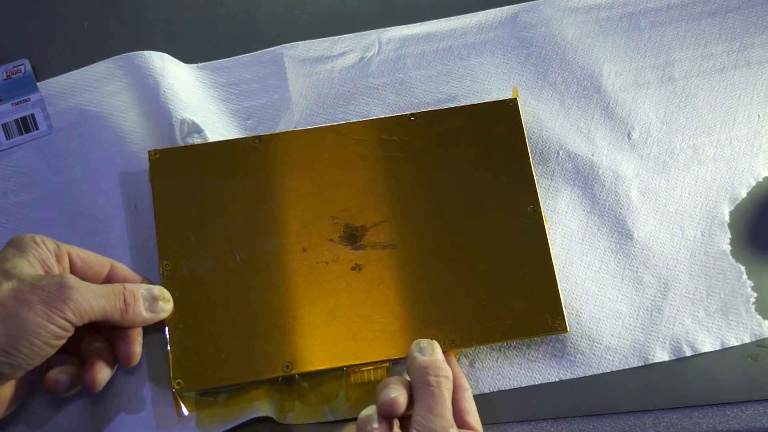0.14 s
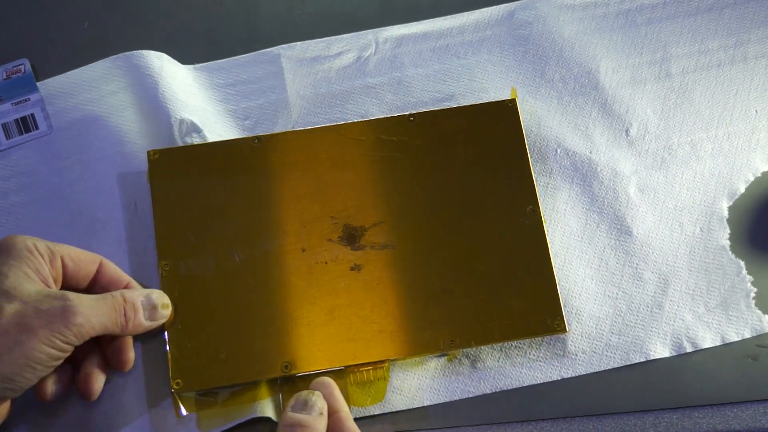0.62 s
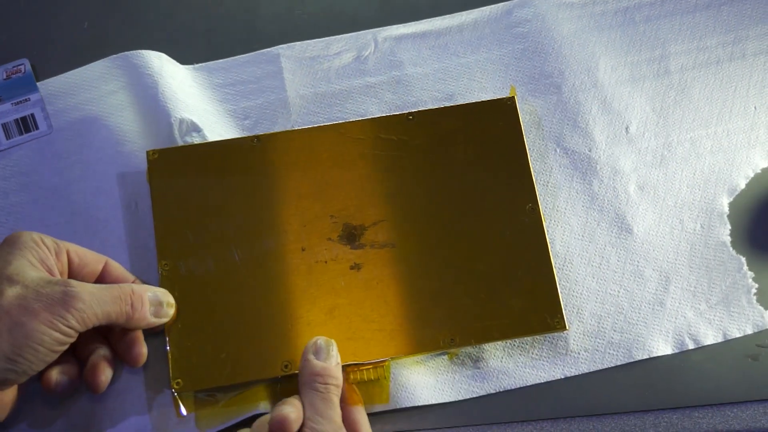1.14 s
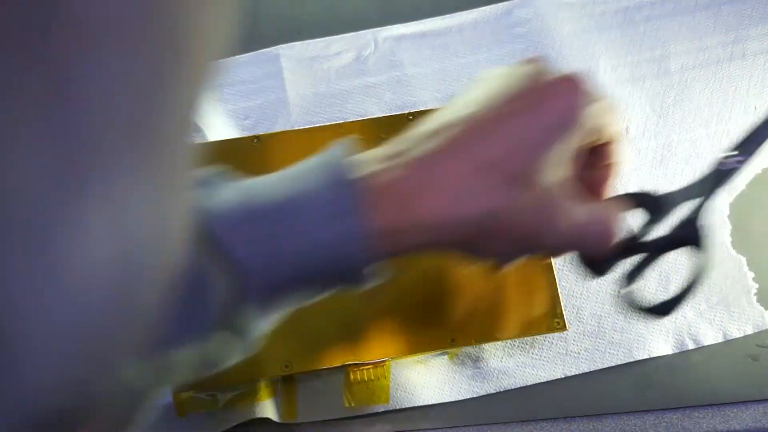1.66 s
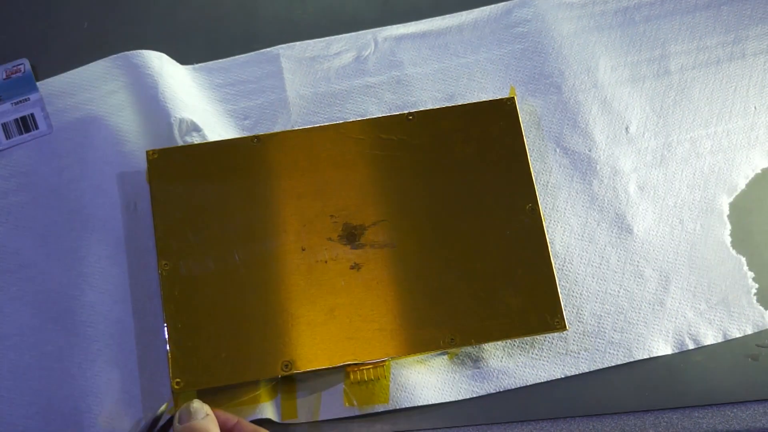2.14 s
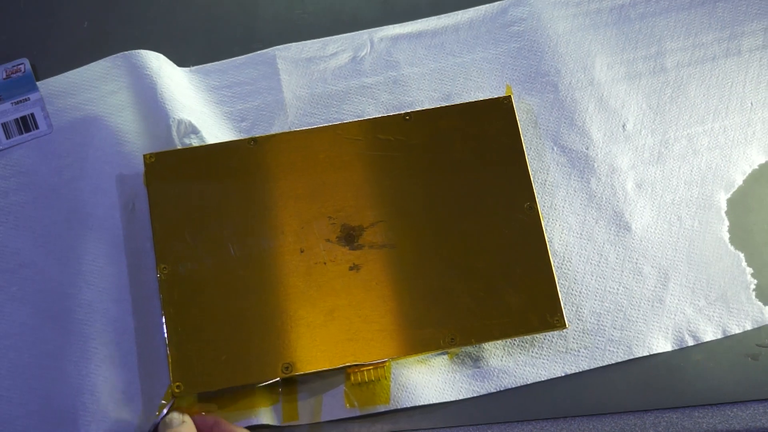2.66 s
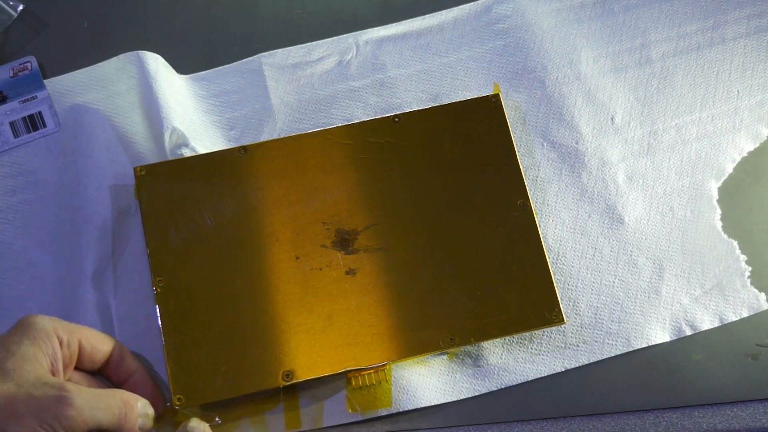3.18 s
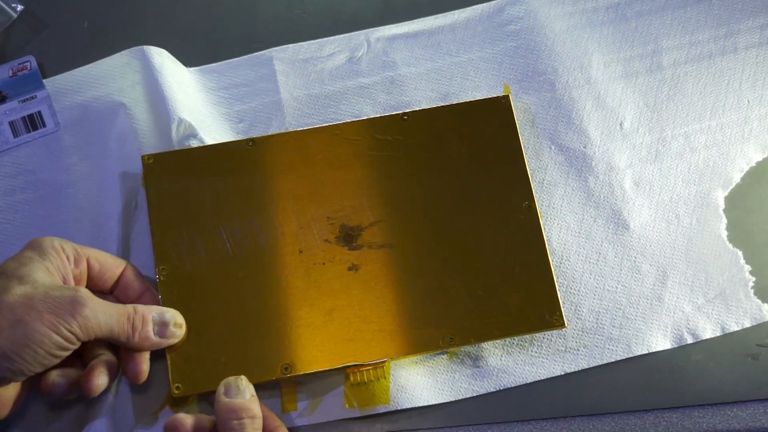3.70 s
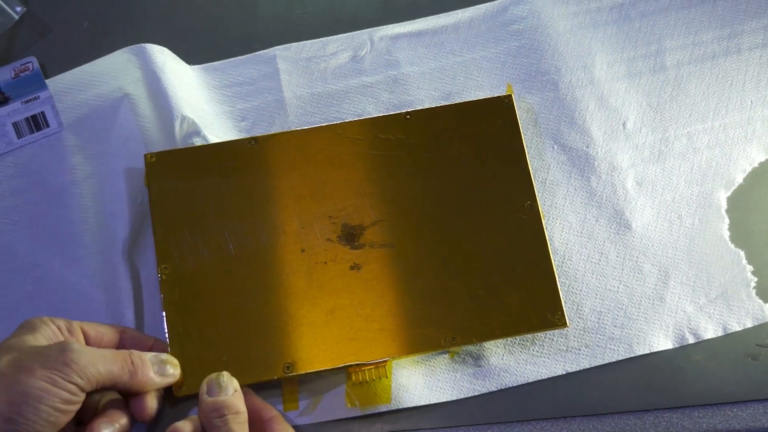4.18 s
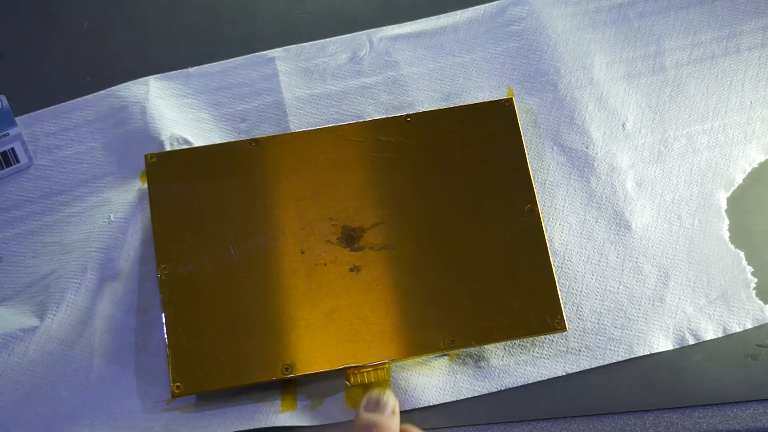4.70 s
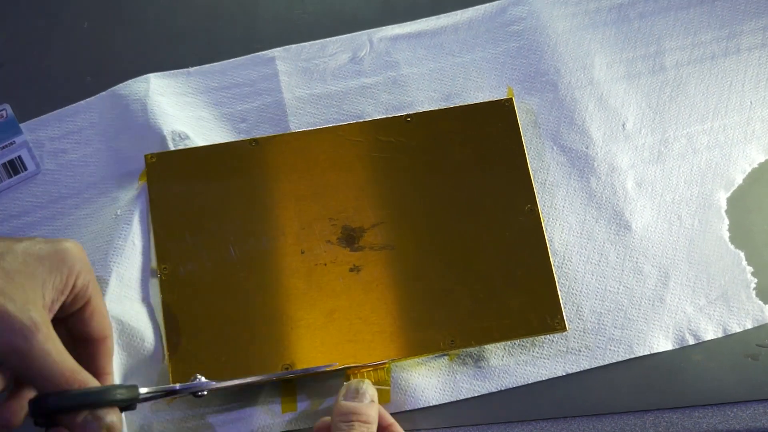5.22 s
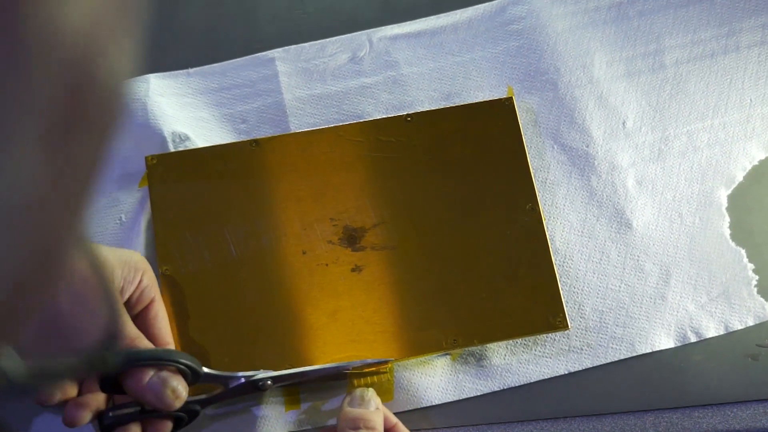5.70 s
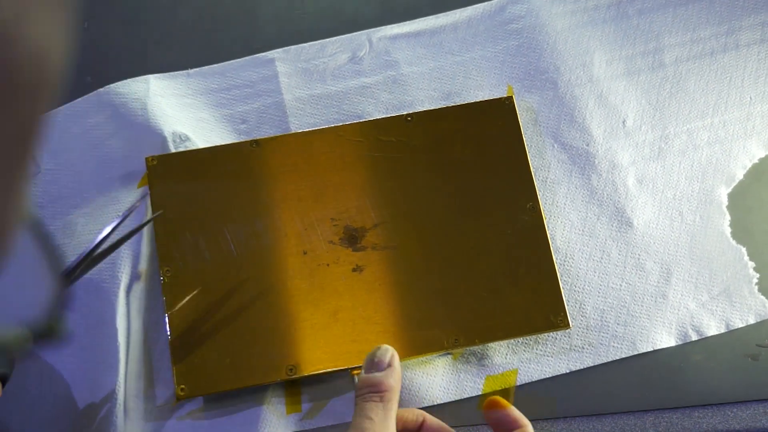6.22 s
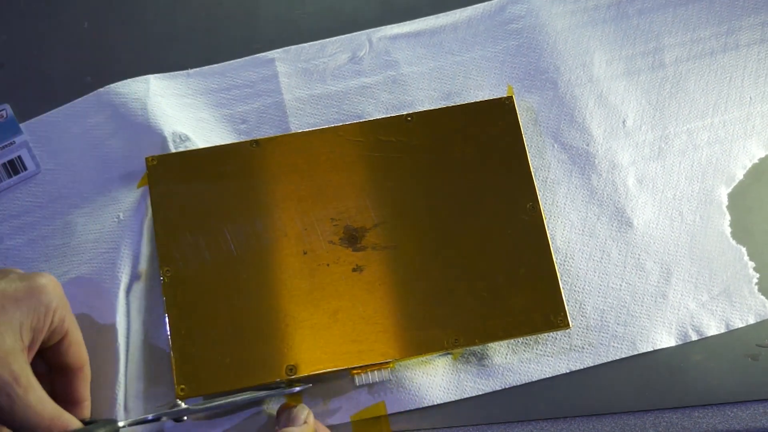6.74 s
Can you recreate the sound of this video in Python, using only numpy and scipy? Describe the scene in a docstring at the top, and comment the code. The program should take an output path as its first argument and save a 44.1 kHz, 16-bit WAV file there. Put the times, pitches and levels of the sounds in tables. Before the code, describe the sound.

Close, dry tape clicks and plate taps come in bursts, then a jerky scrape over paper and light scissor snips, above quiet ventilation.

```python
"""Stiff adhesive tape snaps and crinkles as hands pull it along the edge of a metal plate lying on paper;
scissors snip it, close to a stereo microphone. Snaps are decaying noise bursts through broad resonances, echoed by
the bench top. Fingers and blades scuff (swelled micro-slip noise), the plate is dragged and knocked (damped modes),
narrow resonances ring, the bench thumps (low modes) and paper rustles (flickering noise).
A ventilation hum and room noise lie underneath."""
import sys
import numpy as np
from scipy import signal
from scipy.fft import rfft, irfft, next_fast_len
from scipy.io import wavfile
from scipy.ndimage import uniform_filter1d, map_coordinates

SR = 44100
rng = np.random.default_rng(int(sys.argv[2]) if len(sys.argv) > 2 else 0)


def file_out(sig):
    """Save sig as 16-bit WAV at sys.argv[1]."""
    # one column per channel
    cols = np.atleast_2d(sig).T
    # limit, then scale
    lim = np.clip(cols, -1, 1)
    pcm = np.round(lim * 32767).astype(np.int16)
    wavfile.write(sys.argv[1], SR, pcm)


def level_to_linear(level):
    """Convert decibel levels to linear amplitude factors, elementwise."""
    exponent = np.asarray(level, float) / 20
    return 10 ** exponent


N = 302526

# Paper rustling under the plate. Each row: time in seconds, base level in dB.
RUSTLE_LEVEL = [(0.0, -67.5), (2.69, -65), (3.04, -59), (3.52, -67.5), (4.5, -61.5), (5.05, -67),
                (5.62, -69), (5.96, -59), (6.09, -69), (6.86, -69.5)]


def unit(x):
    """Scales to unit rms."""
    return x / np.sqrt(np.mean(x ** 2) + 1e-20)


def along(points, hz):
    """Interpolates (Hz, value) points on a log frequency axis."""
    f, v = np.transpose(points)
    return np.interp(np.log(hz + 1), np.log(f + 1), v)


def curve(rows):
    """Interpolates (s, value) rows to one value per sample."""
    return np.interp(np.arange(N) / SR, *np.transpose(rows))


def wobble(rate_hz):
    """A smooth random curve, rate_hz knots a second."""
    knots = rng.standard_normal(int(N * rate_hz / SR) + 4)
    return map_coordinates(knots, [np.arange(N) * rate_hz / SR])


def filtered(x, response):
    """Filters x by a complex response of frequency in Hz."""
    m = next_fast_len(x.shape[-1] + 4096)
    spectrum = rfft(x, m) * response(np.fft.rfftfreq(m, 1 / SR))
    return irfft(spectrum, m)[..., :x.shape[-1]]


def noise(spectrum):
    """Unit-rms noise shaped by (Hz, dB) points."""
    return unit(filtered(rng.standard_normal(N), lambda hz: level_to_linear(along(spectrum, hz))))


def hump(centre_hz, octaves, skirt_db):
    """A causal broad resonance with a flat skirt that falls away in the bass."""
    def response(hz):
        peak = np.exp(-(np.log2((hz + 1) / centre_hz) / max(octaves, .1)) ** 2 / 4)
        skirt = level_to_linear(skirt_db) * hz ** 2 / (hz ** 2 + 1300 ** 2)
        # minimum phase, by folding the cepstrum
        cepstrum = irfft(np.log(peak + skirt + 1e-4))
        cepstrum[1:len(hz) - 1] *= 2
        cepstrum[len(hz):] = 0
        return np.exp(rfft(cepstrum))
    return response


def add(track, s, sound):
    """Mixes sound into track from s seconds on."""
    part = track[max(round(s * SR), 0):][:len(sound)]
    part += sound[:len(part)]


def snaps():
    """A faint noise swells for a few milliseconds before each snap; bench echoes and a short crackle follow."""
    # Snaps of tape and blades. Each row: time in seconds, peak before echoes in dB, centre in Hz.
    snap_rows = [(0.0508, -32, 5500), (0.077, -31.5, 8450), (1.3793, -18.5, 4330), (1.5832, -22.5, 1800),
                 (1.63, -21, 5800), (2.283, -26.5, 8100), (2.3549, -22, 7540), (2.3655, -19, 7800),
                 (2.4348, -25, 7960), (2.5512, -28, 8500), (2.5882, -32.5, 7200), (2.657, -26.5, 8070),
                 (2.6983, -24.5, 9580), (2.704, -28.5, 4900), (2.7308, -33, 5270), (2.798, -35, 9700),
                 (2.8563, -5, 12000), (2.963, -19.5, 5900), (2.9705, -19, 6800), (2.9773, -22.5, 3020),
                 (3.013, -27, 9600), (3.0216, -20.5, 2020), (3.0363, -14, 7500), (3.0509, -21, 7600),
                 (3.1641, -4.5, 10300), (3.2568, -23, 7000), (3.2869, -23.5, 7350), (3.4258, -17.5, 10300),
                 (3.4707, -9, 8200), (3.855, -23.5, 9750), (4.885, -27, 7950), (5.2632, -23, 8100),
                 (5.293, -33, 8700), (5.3497, -17, 8250), (5.9578, -32.5, 5600), (6.0654, -20, 9540)]
    # The brightest snaps ring narrowly. Each row: centre in Hz, spread in octaves.
    snap_spread = [(2500, 0.67), (8000, 0.99), (10000, 0.17)]
    # Echoes off the bench and nearby things. Each row: delay in seconds, treble level in dB.
    echo_rows = [(.0016, -3), (.0039, -20), (.0056, -22)]
    burst_t60_cycles, crackle_t60_s, lead_in_t60_s = 11.3, 0.034, 0.0068
    crackle_db, crackle_db_per_snap_db = -28, 0.75  # crackle_db: at release of a 0 dB snap

    def echoes(f):
        delayed = sum(level_to_linear(db) * np.exp(-2j * np.pi * f * s) for s, db in echo_rows)
        return 1 + f / (f + 1500) * delayed

    out, t = np.zeros(N), np.arange(-400, 2600) / SR
    for s, db, hz in snap_rows:
        octaves = along(snap_spread, hz)
        decay = level_to_linear(-60 * np.abs(t) / (burst_t60_cycles / hz)) * (t >= 0)
        burst = rng.standard_normal(len(t)) * decay
        skirt_db = -42 - 2.3 * np.log2(8000 / hz)  # duller snaps have less treble skirt
        click = filtered(burst, hump(hz, octaves, skirt_db))
        crackle = unit(filtered(rng.standard_normal(len(t)), hump(0.37 * hz, octaves + .5, skirt_db=-25)))
        lead_in = level_to_linear(-21.0 + 60 * t / lead_in_t60_s)
        envelope = np.where(t >= 0, level_to_linear(-60 * t / crackle_t60_s), lead_in)
        echoed = level_to_linear(db) * filtered(click, echoes) / np.abs(click).max()
        add(out, s + t[0], echoed + level_to_linear(crackle_db + crackle_db_per_snap_db * db) * envelope * crackle)
    return out


def plate(force, t60_s, near_hz):
    """The plate's modes, the higher dying sooner; contact place favours those near near_hz, grip detunes them."""
    # Modes of the plate, damped by the paper under it. Each row: frequency in Hz, level in dB.
    plate_modes = [(910, 12), (1100, 10), (1490, -16), (1950, 12), (2640, -15), (3300, -5)]
    hz, db = np.transpose(plate_modes)
    db = db - 13 * np.abs(np.log2(hz / near_hz)) + rng.normal(0, 2.3, len(hz))
    hz = hz * rng.normal(1, .025, len(hz))

    def mode(f, k, c):
        width_hz = np.log(1000) / (np.pi * t60_s) * (c / hz[0]) ** .5  # t60_s is the lowest mode's
        return (-1) ** k * level_to_linear(db[k]) * 1j * f * c / (c * c - f * f + 1j * f * width_hz)

    return filtered(force, lambda f: sum(mode(f, k, c) for k, c in enumerate(hz)))


def rubbing(size, hz, low_db):
    """Dense uneven micro-slips; they also drive the plate and a dull body."""
    slips = rng.standard_normal(size) * level_to_linear(1.5 * rng.exponential(size=size))
    lumps = level_to_linear(2.0 * map_coordinates(rng.standard_normal(size // 100 + 2), [np.arange(size) / 100]))
    bright = unit(filtered(slips, hump(hz, 0.84, skirt_db=-33)))
    body = unit(filtered(slips, hump(1467, 0.82, skirt_db=-80)))
    dull = unit(unit(plate(slips, t60_s=0.039, near_hz=1200)) + 1.8 * body)
    return lumps * (bright + level_to_linear(low_db) * dull)


def scuffs(count=30):
    """Rubbing under a swell, for the listed strokes and for faint ones at random, likelier in louder rustle."""
    # Scuffs and crinkles. Each row: middle in seconds, level in dB, length in seconds,
    # dull part over bright part in dB.
    scuff_rows = [(0.321, -58, 0.033, -3), (0.729, -51, 0.015, -3.5), (0.831, -59, 0.033, -2),
                  (1.021, -48.5, 0.039, -6.5), (1.168, -59, 0.03, -1), (1.306, -59, 0.05, -18),
                  (1.3854, -38.5, 0.026, -4), (1.401, -47, 0.0067, -1), (1.445, -58, 0.06, 2),
                  (1.592, -46, 0.03, 3), (1.607, -56.5, 0.079, 8), (1.631, -42, 0.022, 3),
                  (1.712, -39, 0.059, -37), (1.769, -53, 0.022, -10), (1.786, -43.5, 0.072, -30),
                  (2.098, -49, 0.02, -6), (2.141, -53.5, 0.033, 3.5), (2.219, -43.5, 0.036, -3.5),
                  (2.288, -39.5, 0.021, -10.5), (2.365, -49.5, 0.0091, 4), (2.444, -50, 0.035, -4),
                  (2.478, -61.5, 0.011, 8), (2.712, -53.5, 0.04, 6), (2.836, -49, 0.0092, -8),
                  (2.862, -29.5, 0.0057, -12), (2.92, -48.5, 0.032, -5.5), (2.973, -32.5, 0.027, -11.5),
                  (2.983, -48, 0.02, 0), (3.019, -41, 0.0054, 7), (3.029, -49.5, 0.0097, 4),
                  (3.055, -38.5, 0.012, -13), (3.083, -51, 0.028, -15), (3.131, -53, 0.061, -21),
                  (3.186, -47.5, 0.023, -5.5), (3.385, -58.5, 0.045, -8), (3.412, -50, 0.027, -8),
                  (3.476, -35, 0.016, -6.5), (3.952, -52, 0.024, -5.5), (4.091, -55, 0.037, -4.5),
                  (4.14, -49.5, 0.014, -8), (4.201, -59.5, 0.031, 1.5), (4.334, -57, 0.025, 2.5),
                  (4.414, -46, 0.024, -10), (4.461, -48, 0.025, -8.5), (4.588, -41.5, 0.031, -33),
                  (5.17, -51, 0.03, -1), (5.271, -47, 0.025, 3), (5.563, -61.5, 0.064, 0.5),
                  (5.768, -48.5, 0.018, 0.5), (5.871, -46, 0.019, -2.5), (5.931, -59, 0.017, 5.5),
                  (5.996, -42, 0.03, -14), (6.101, -46, 0.022, -6.5), (6.484, -41, 0.058, -18),
                  (6.579, -57.5, 0.034, 3)]
    ref_hz, ref_s, brightens = 5060, 0.025, 0.44  # a ref_s scuff centres at ref_hz; quicker ones are brighter
    faint_db, faint_s = -62, 0.012  # mean level and length
    out, t = np.zeros(N), np.arange(8000) / SR
    busy = np.cumsum(level_to_linear(curve(RUSTLE_LEVEL)))
    when, loud, long, low = rng.random((count, 4)).T
    faint_at = np.searchsorted(busy, when * busy[-1]) / SR
    faint = zip(faint_at, faint_db + 8 * (loud - .5), faint_s * (.5 + long), -12 * low)
    for s, db, length_s, low_db in scuff_rows + list(faint):
        late = (t - t[4000]) / length_s
        stroke = np.exp(-np.abs(late / 0.34) ** 2.57)
        settling = 0.073 * np.exp(-np.abs((late - .6) / 1.06) ** 2)  # trails the stroke
        rub = rubbing(len(t), ref_hz * (ref_s / length_s) ** brightens, low_db)
        add(out, s - t[4000], level_to_linear(db) * (stroke + settling) * rub)
    return out


def drag():
    """One long jerky rub as the plate is dragged over the paper in two pulls; the bench rumbles under it."""
    # Drag envelope. Each row: time in seconds, base level in dB.
    drag_level = [(4.53, -67), (4.56, -57), (4.575, -51), (4.61, -47.5), (4.638, -48), (4.655, -47),
                  (4.668, -49), (4.708, -51.5), (4.72, -46), (4.745, -48.5), (4.778, -66), (4.82, -54),
                  (4.855, -54), (4.866, -46), (4.884, -51), (4.896, -47.5), (4.915, -47.5), (4.928, -58),
                  (4.94, -56), (4.985, -52), (5.0, -64), (5.04, -70)]
    rub_hz, low_db, body_hz, body_db = 4200, -1, 263, -6.5
    out = np.zeros(N)
    start, end = round(drag_level[0][0] * SR), round(drag_level[-1][0] * SR)
    level = level_to_linear(curve(drag_level) + 2.5 * wobble(90))[start:end]
    level = level * signal.windows.tukey(end - start, .1)
    body = unit(filtered(rng.standard_normal(end - start), hump(body_hz, .5, skirt_db=-80)))
    add(out, start / SR, level * (rubbing(end - start, rub_hz, low_db) + level_to_linear(body_db) * body))
    return out


def rings():
    """Slips under a short swell, heard through one narrow resonance of blade, film or plate."""
    # Short ringing rubs. Each row: middle in seconds, level in dB, length in seconds, resonance in Hz.
    ring_rows = [(0.075, -56, 0.011, 900), (0.193, -57.5, .014, 1050), (0.658, -55, 0.01, 880),
                 (.72, -55, 0.078, 1023), (0.82, -56, 0.049, 1015), (1.017, -49.5, 0.032, 1046),
                 (2.144, -48.5, 0.027, 1084), (3.918, -59, .015, 1060), (1.629, -43.5, 0.019, 3320),
                 (3.036, -34, 0.0027, 1850), (3.261, -50, .008, 4200), (4.624, -46, 0.017, 1150),
                 (4.652, -46, 0.015, 4600), (4.726, -46, 0.04, 4380), (4.722, -44.5, 0.033, 5570),
                 (4.994, -52, 0.011, 1030), (5.264, -49, .01, 2250), (5.333, -54, .014, 1040),
                 (5.347, -45, 0.0049, 3370), (5.872, -51.5, 0.014, 2300), (5.93, -46, 0.012, 1200),
                 (5.931, -44, 0.012, 2090), (5.995, -45, 0.027, 5280), (6.065, -47, 0.0057, 3600),
                 (6.482, -44, 0.036, 4780), (6.494, -39, .009, 4630), (6.521, -54, .012, 4700),
                 (6.576, -47, 0.024, 940), (6.58, -56.5, 0.025, 1910), (6.583, -52.5, 0.023, 3740),
                 (6.669, -56.5, 0.0089, 1000)]
    width_ratio = .15  # of the pitch, per resonator; two in series
    out, t = np.zeros(N), np.arange(-2000, 2000) / SR
    for s, db, length_s, hz in ring_rows:
        swell = np.exp(-(t / (0.37 * length_s)) ** 2)
        jerks = level_to_linear(4 * map_coordinates(rng.standard_normal(size=22), [np.arange(len(t)) / 200]))
        slips = swell * jerks * rng.standard_normal(len(t))
        width_hz = width_ratio * hz
        tone = filtered(slips, lambda f: (1j * f * width_hz / (hz * hz - f * f + 1j * f * width_hz)) ** 2)
        add(out, s + t[0], level_to_linear(db) * unit(tone) * np.sqrt(np.mean(swell ** 2)))
    return out


def knocks():
    """A soft push sets the plate ringing."""
    # Knocks on the plate. Each row: start in seconds, peak in dB, favoured frequency in Hz.
    knock_rows = [(.404, -46.5, 900), (1.379, -27.5, 1120), (1.399, -40.5, 1100), (1.5834, -32.5, 1490),
                  (1.629, -49, 1400), (2.354, -38.5, 1010), (2.3655, -38, 1950), (2.859, -44, 1950),
                  (3.022, -33.5, 1100), (3.4706, -32, 1300), (3.855, -52.5, 1900), (5.264, -46, 1500),
                  (5.35, -40, 900), (5.55, -44, 1090), (5.765, -51, 1100), (5.867, -40.5, 1060),
                  (5.882, -40.5, 950), (6.016, -43.5, 930)]
    out = np.zeros(N)
    for s, db, hz in knock_rows:
        push = np.pad(np.hanning(10), (0, 6000))
        ring = plate(push, t60_s=0.039, near_hz=hz)
        add(out, s, level_to_linear(db) * ring / np.abs(ring).max())
    return out


def thumps(table):
    """The bench's low modes swing, most those near the favoured pitch, with a dull puff."""
    # Modes of the bench top. Each row: frequency in Hz, t60 in seconds.
    bench_modes = [(68, 0.21), (110, 0.026), (158, 0.11), (214, 0.1), (335, 0.045)]
    out, t = np.zeros(N), np.arange(9000) / SR
    for s, db, near_hz in table:
        puff = unit(filtered(rng.standard_normal(len(t)), hump(1.15 * near_hz, .4, skirt_db=-80)))
        swing = 0
        for k, (hz, t60_s) in enumerate(bench_modes):
            level = level_to_linear(-22 * abs(np.log2(hz / near_hz)) - 60 * t / t60_s)
            swing = swing + (-1) ** k * level * np.sin(2 * np.pi * hz * t)
        onset = 1 - np.exp(-t * near_hz / 0.23)
        add(out, s, -level_to_linear(db) * onset * (swing + 0.3 * level_to_linear(-60 * t / 0.04) * puff))
    return out


def rustle():
    """Fine flickering paper noise, with sparse tiny ticks of creases."""
    # Spectrum of the paper noise. Each row: frequency in Hz, level in dB.
    paper_spectrum = [(200, 6), (400, -1), (900, 15), (2000, 13), (9000, 6.5), (15600, -4), (16200, -50)]
    flicker_db = 2 * wobble(30) + 2 * wobble(110)
    ticks = 9 * rng.standard_normal(N) * (rng.random(N) < 200 / SR)  # about 200 a second
    crisp = filtered(ticks, hump(7200, 0.99, skirt_db=-46))
    return level_to_linear(curve(RUSTLE_LEVEL) + flicker_db) * (noise(paper_spectrum) + crisp)


def air():
    """Wavering fan tones and turbulence in two duct resonances over room noise; returns mid and side."""
    # Duct resonances. Each row: frequency in Hz, width in Hz, relative level in dB.
    duct_modes = [(117.6, 22.5, 5), (197.7, 20.3, -1.5)]
    # Fan tones. Each row: mean frequency in Hz, relative level in dB.
    fan_tones = [(119, 0), (203, -9)]
    # Room noise spectra, mid then side. Each row: frequency in Hz, relative level in dB.
    room_mid = [(20, -14), (60, -6), (110, 1), (200, -5), (330, -17), (550, -21.5), (950, -18), (1500, -46),
                (3000, -32), (10500, -33), (12000, -26.5), (15500, -29), (16200, -93)]
    room_side = [(20, -36), (140, -2.5), (280, -7), (500, -14), (1500, -23.5), (3000, -32.5), (9900, -32.5),
                 (11800, -54)]

    def duct(f):
        return sum(level_to_linear(db) * 1j * f * w / (c * c - f * f + 1j * f * w) for c, w, db in duct_modes)

    fan = sum(level_to_linear(db) * np.sin(2 * np.pi * np.cumsum(hz + 6 * wobble(14)) / SR) for hz, db in fan_tones)
    turbulence = unit(filtered(rng.standard_normal(N), duct))
    hum = unit(turbulence + 1.6 * fan)
    mid = level_to_linear(-54.0) * hum + level_to_linear(-56.5) * noise(room_mid)
    side = level_to_linear(-60.5 + 1.5 * wobble(2.65)) * noise(room_side)
    return mid, side


def patchy(x, depth_db, turn_rad):
    """Random patches in time and frequency: gain of rms depth_db, phase of rms turn_rad."""
    def patches(shape):
        over_hz = uniform_filter1d(rng.standard_normal(shape), size=7, axis=0)
        return unit(uniform_filter1d(over_hz, size=4, axis=1))

    z = signal.stft(x, nperseg=256)[2]
    gain, phase = patches(z.shape), patches(z.shape)
    return signal.istft(z * level_to_linear(depth_db * gain) * np.exp(1j * turn_rad * phase), nperseg=256)[1][:N]


def scene():
    """Two microphone ports hear near sounds with unsteady phase: the side runs about a quarter cycle behind."""
    # Soft bumps, strong in the side. Each row: start in seconds, level in dB, favoured frequency in Hz.
    bump_rows = [(1.905, -31, 150), (1.907, -40, 335), (1.977, -33, 167), (1.984, -39.5, 335),
                 (2.091, -40.5, 158)]
    # Thumps through the bench. Each row: start in seconds, level in dB, favoured frequency in Hz.
    thump_rows = [(.909, -27.5, 115), (1.584, -33, 335), (1.625, -33, 219), (1.628, -29.5, 314),
                  (1.761, -42.5, 66), (2.973, -33.5, 208), (3.021, -30, 340), (3.019, -37, 70),
                  (3.033, -37, 370), (4.537, -34, 87), (4.092, -35, 85), (4.345, -37, 120),
                  (5.551, -44, 320)]
    # Treble response to near sounds. Each row: frequency in Hz, gain in dB.
    mic_response = [(10500, 0), (13000, -4), (16000, -8), (16700, -12), (17200, -60)]
    # Side over mid for near sounds. Each row: frequency in Hz, gain in dB.
    side_gain = [(100, -18), (300, -9.5), (900, -13), (2500, -6.5), (6000, -16.5), (15000, -14.5)]
    friction = patchy(scuffs() + drag() + rustle(), depth_db=2.03, turn_rad=0)
    bumps = thumps(bump_rows)
    near = snaps() + knocks() + rings() + thumps(thump_rows) + friction
    near = filtered(near, lambda f: level_to_linear(along(mic_response, f)))
    unsteady = patchy(near, depth_db=5.4, turn_rad=0.41)
    wide = filtered(unsteady, lambda f: -1j * level_to_linear(along(side_gain, f)))
    # deep bass stays in the middle
    wide += filtered(bumps, lambda f: -1j * level_to_linear(7.5) * f * f / (f * f + 90 ** 2))
    mid, side = air()
    return np.array([near + bumps + mid + wide + side, near + bumps + mid - wide - side])


def low_pass(x):
    """Removes everything above the highest recorded frequency."""
    return signal.sosfilt(signal.butter(12, 17140, fs=SR, output="sos"), x)


def record(dry):
    """The stereo mix as the recorder stores it."""
    return low_pass(dry)


dry = scene()
out = record(dry)
file_out(out)
```